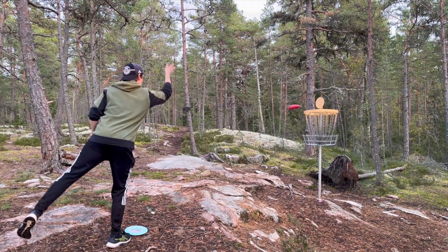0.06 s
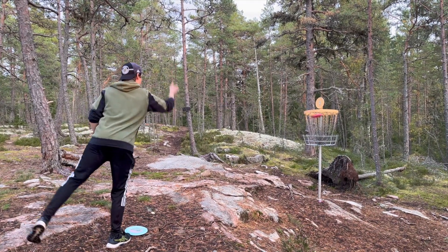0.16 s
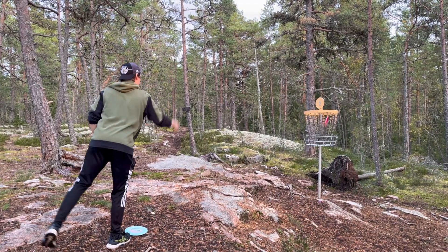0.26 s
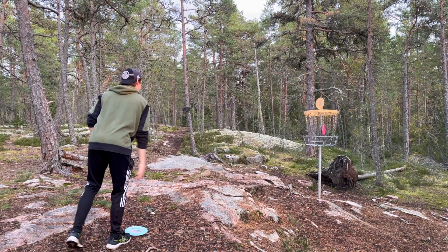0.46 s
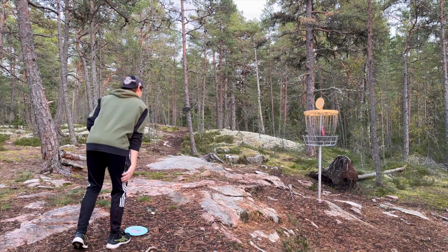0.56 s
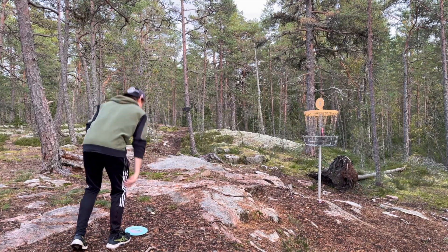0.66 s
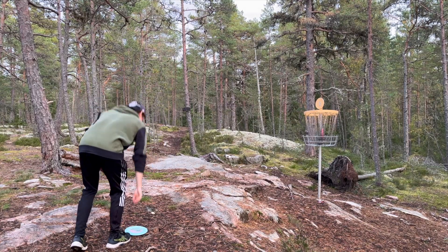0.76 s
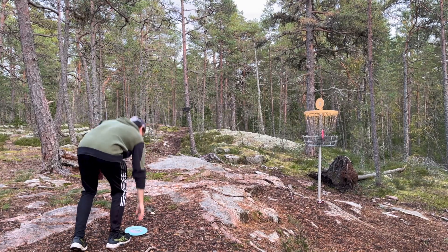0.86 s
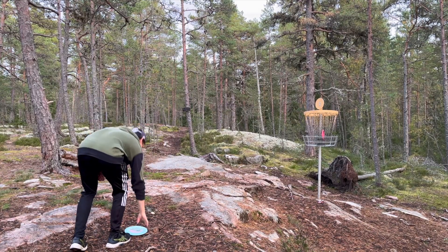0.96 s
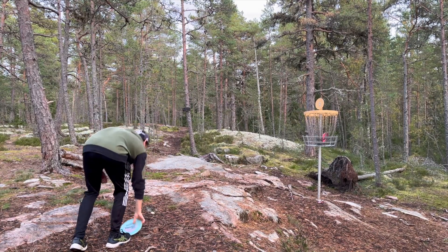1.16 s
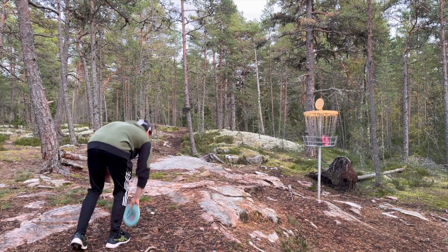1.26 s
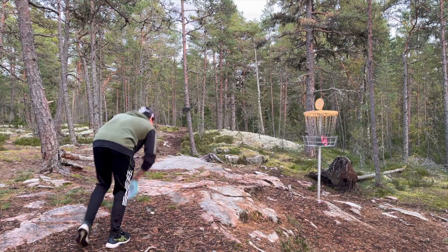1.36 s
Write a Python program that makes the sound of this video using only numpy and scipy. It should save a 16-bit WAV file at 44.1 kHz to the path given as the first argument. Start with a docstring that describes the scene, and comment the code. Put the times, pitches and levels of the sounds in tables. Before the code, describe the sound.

In a quiet forest, chains jangle brightly as a thrown disc strikes a basket a few metres off, slightly to the right. The rattle settles, the disc drops into the tray with hollow knocks, and the metal rings on faintly.

```python
"""A disc golf basket in a quiet forest

A plastic disc flies into the basket's steel chains a few metres away. The chains jangle in surges
as they swing, steel clangs on steel, and at last the disc drops into the wire tray.
The basket's frame rings on, and tree trunks scatter a thin echo over a low hush of air."""
import sys
import numpy as np
from scipy import signal
from scipy.fft import rfft, irfft, next_fast_len
from scipy.io import wavfile
from scipy.ndimage import map_coordinates

SR = 44100
rng = np.random.default_rng(int(sys.argv[2]) if len(sys.argv) > 2 else 0)


def generate_wav(signal):
    """Clip the signal to [-1, 1] and save it as 16-bit WAV at the path in sys.argv[1]."""
    frames = np.transpose(np.atleast_2d(signal))
    scaled = np.clip(frames, -1, 1) * 32767
    pcm = np.round(scaled).astype(np.int16)
    wavfile.write(sys.argv[1], SR, pcm)


N = 61739
LOWEST_HZ, TREBLE_HZ, TOP_HZ = 447.6, 7030, 15850  # edges of the chains' lower and upper ranges


def amp(db):
    """Turn decibels into a number to multiply by."""
    return 10 ** (np.asarray(db) / 20)


def unit(x):
    """Scale a signal to an average power of 1."""
    return x / np.sqrt(np.mean(x ** 2) + 1e-20)


def along(points, hz):
    """Read a curve drawn through (Hz, value) points, with octaves evenly spaced."""
    point_hz, values = np.transpose(points)
    return np.interp(np.log(hz + 1), np.log(point_hz + 1), values)


def filtered(x, response):
    """Multiply each frequency in x by response(hz)."""
    size = next_fast_len(N + SR // 2)
    return irfft(rfft(x, size) * response(np.fft.rfftfreq(size, 1 / SR)), size)[..., :N]


def coloured(x, colour):
    """Turn frequencies up or down along a curve of (Hz, dB) points."""
    return filtered(x, lambda hz: amp(along(colour, hz)))


def noise(colour):
    """Noise of the given colour, with a power of 1."""
    return unit(coloured(rng.standard_normal(N), colour))


def fade(t, ring_s):
    """Start at t = 0 and die away; the ring time is how long a fall of 60 dB takes."""
    return (t >= 0) * np.exp(-np.log(1000) * np.maximum(t, 0) / ring_s)


def since(start):
    """Seconds since the start, at every sample."""
    return np.arange(N) / SR - start


def wobble(per_s):
    """A smooth curve through per_s random values a second."""
    return map_coordinates(rng.standard_normal(512), [np.arange(N) * per_s / SR], mode='wrap')


def ring(tones, start, high_db=0, high_hz=TREBLE_HZ, scatter_db=1, sustain=1, beat_hz=0):
    """A struck object rings in wavering tones; beat_hz gives each low one a twin, so it pulses."""
    t, out = since(start), np.zeros(N)
    for hz, db, ring_s in tones:
        wavering_hz = hz + 9.1 * wobble(per_s=60)
        phase = 2 * np.pi * np.cumsum((t >= 0) * wavering_hz) / SR
        twin = amp(-1.5) * (beat_hz > 0 and hz < high_hz) * np.sin(phase + 2 * np.pi * beat_hz * t)
        gain = amp(db + scatter_db * rng.standard_normal() + high_db * (hz > high_hz))
        out += gain * fade(t, ring_s * sustain) * (np.sin(phase) + twin)
    return out


def air():
    """The air makes a low, wavering hush, nearly the same in both ears."""
    # The colour of the hush. Each row: frequency in Hz, level in dB.
    colour = [(20, -21), (48, -2.5), (160, -2), (230, -6.5), (420, -11.5), (850, -14), (1200, -20),
              (2500, -45), (12000, -65.5)]
    level = amp(-52.5 + 1.5 * wobble(per_s=13.93))
    middle, side = noise(colour), amp(-14.5) * noise(colour)
    return level * (middle + np.array([side, -side]))


def links(motion, peak_hits_per_s, low_hz, high_hz, count=20, tones=5):
    """Links collide at random, less often and more softly as they settle; each ticks and rings."""
    out, t = np.zeros(N), np.arange(SR // 3) / SR
    chance = peak_hits_per_s / count / SR * (motion / motion.max() + 1e-9) ** .45
    band = signal.butter(3, [low_hz, high_hz], 'band', fs=SR, output='sos')
    for link in range(count):
        slots = np.arange(tones) + (link + rng.random(tones)) / count  # each link has its own pitches
        hz = low_hz + (high_hz - low_hz) * slots / tones
        waves = np.sin(2 * np.pi * (hz[:, None] * t + rng.random((tones, 1))))
        ringing = waves.sum(0) * fade(t, ring_s=.13)
        tick = signal.sosfilt(band, rng.standard_normal(len(t)) * fade(t, ring_s=.0047))
        voice = unit(ringing) + amp(-4) * unit(tick)
        force = unit(amp(5.5 * np.clip(rng.standard_normal(N), -2, 2)))
        hits = (rng.random(N) < chance) * force / np.sqrt(chance)
        out += signal.fftconvolve(hits * motion, voice / np.linalg.norm(voice))[:N]
    return out / np.sqrt(count)


def chains():
    """The swinging chains jangle in surges that rise fast and die away."""
    # The surges. Each row: start in seconds, level in dB, rise time in seconds,
    # seconds to fade by 60 dB, extra treble in dB.
    surges = [(0.212, -30, 0.002, 0.51, 0), (0.221, -30, 0.0066, 0.11, 8.5), (0.242, -29, 0.017, 0.36, 1),
              (0.331, -31.5, 0.0025, 0.36, -2), (0.334, -28, 0.0024, 0.041, 7),
              (0.391, -41, 0.015, 0.46, 7.5), (.465, -28.5, 0.0014, 0.04, 5), (0.47, -39, 0.016, 0.62, 2),
              (0.603, -39.5, 0.0059, 0.51, 3), (.707, -42, 0.0043, 0.22, 4.5),
              (.724, -39.5, 0.0055, 0.28, 3), (.81, -50, 0.017, 0.52, 1.5),
              (0.922, -46.5, 0.00504, 0.18, -0.5), (.96, -50.5, 0.015, 0.53, -1.5),
              (1.033, -52, 0.01, 0.43, 1), (1.128, -31, 0.00056, 0.0385, 0),
              (1.135, -39.5, 0.0033, 0.23, -3), (1.195, -52, 0.0055, 0.5, -6.5),
              (1.322, -43, 0.0087, 0.17, 0.5)]
    # The colour of the jangle. Each row: frequency in Hz, boost or cut in dB.
    colour = [(200, -66), (550, -12.5), (850, -20), (1100, -12.5), (1500, 0), (1900, -11), (2400, -2.5),
              (3000, 4.5), (3400, 5), (3600, -1), (3900, 8), (4400, -2.5), (5600, -1.5), (8000, -1),
              (9800, 2.5), (13000, 5.5), (14600, 6), (15700, -34)]
    body_energy, treble_energy = np.zeros(N), np.zeros(N)
    for start, db, rise_s, fade_s, treble_db in surges:
        t = since(start)
        surge = amp(db) * np.clip(t / rise_s, 0, 1) * fade(np.maximum(t - rise_s, 0), fade_s)
        body_energy += surge ** 2
        treble_energy += (surge * amp(treble_db)) ** 2
    body = links(np.sqrt(body_energy), 1600, LOWEST_HZ, TREBLE_HZ)
    light_touches = links(np.sqrt(treble_energy), 4500, TREBLE_HZ, TOP_HZ)
    jangle = body + light_touches
    top = filtered(jangle, lambda hz: 1 / (1 + (11300 / (hz + 1)) ** 20))
    top_kept = (treble_energy / treble_energy.max()) ** .2  # gentler hits lose their highest treble
    return coloured(jangle + top * (top_kept - 1), colour)


def clangs():
    """Steel strikes steel, and tones close in pitch shimmer against each other."""
    # The hard blows. Each row: start in seconds, level in dB, extra treble in dB,
    # how many times longer the steel rings, pulsing rate in Hz.
    blows = [(0.213, -40, 3, 0.51, 107), (.333, -22, 4.5, 0.59, 43), (.358, -25, 3, 1.57, 32.6),
             (.375, -21.5, -6, 0.2, 20), (.58, -45.5, -11, 1.9, 32.6), (1.131, -35, -1.5, 1.18, 8.3)]
    # The tones of the basket's steel. Each row: pitch in Hz, level in dB, ring time in seconds.
    steel_tones = [(2813, -28, .45), (3800, -1, .3), (3858, -14, .35), (3918, -15, .16), (4060, -8, .07),
                   (5683, -19, .2), (10441, -8, .25), (10715, -10, .22), (10910, -12, .15)]
    out = np.zeros(N)
    for start, db, high_db, sustain, beat_hz in blows:
        rise = np.clip(since(start) / .0015, 0, 1)
        out += amp(db) * rise * ring(steel_tones, start, high_db, sustain=sustain, beat_hz=beat_hz)
    return out


def disc():
    """Light plastic gives short, hollow knocks; a blow on the rim brings out the higher tones."""
    # The disc's knocks. Each row: start in seconds, level in dB, boost of the higher tones in dB.
    knocks = [(0.2137, -28, 11), (.228, -29, -22), (0.262, -28.5, 1), (.271, -31.5, -6), (.304, -36, -2),
              (0.378, -43.5, 4), (1.13, -41, 5), (1.3087, -31.5, -8), (1.329, -32.5, -6), (1.344, -33, -1),
              (1.35, -39.5, -10)]
    # The tones of the plastic. Each row: pitch in Hz, level in dB, ring time in seconds.
    plastic_tones = [(556.7, -16.5, 0.11), (704, -17, 0.04), (805, -16, 0.055), (930, -7.5, 0.039),
                     (1302, -6, 0.045), (1610, -12, 0.035), (2094, -8, 0.023), (2490, -5, 0.01)]
    # The colour of the crack that opens each knock. Each row: frequency in Hz, level in dB.
    crack_colour = [(300, -12), (900, 2), (2600, 3), (5000, -20)]
    out = np.zeros(N)
    for start, db, rim_db in knocks:
        ringing = ring(plastic_tones, start, rim_db, high_hz=1800, scatter_db=5.5)
        crack = amp(-9) * fade(since(start), ring_s=.025) * noise(crack_colour)
        out += amp(db) * (ringing + crack)
    bass_cut = signal.butter(2, LOWEST_HZ, 'high', fs=SR, output='sos')
    return signal.sosfilt(bass_cut, out)


def clinks(ring_s=.2):
    """Now and then a single link rings out with one clear tone."""
    # The single links. Each row: start in seconds, pitch in Hz, level in dB.
    single_links = [(0.306, 3045, -39), (0.612, 3200, -42), (0.732, 2853, -38.5), (.752, 3878, -37.5),
                    (0.967, 4080, -47), (1.05, 3165, -49)]
    return sum(ring([(hz, db, ring_s)], start) for start, hz, db in single_links)


def tray():
    """The disc lands in the wire tray, which rings lower than the clanging steel."""
    # The disc's landings. Each row: start in seconds, level in dB.
    landings = [(1.326, -49), (1.345, -42)]
    # The tones of the tray. Each row: pitch in Hz, level in dB, ring time in seconds.
    wire_tones = [(535, -7, .4), (1241, 0, .45), (1610, -10, .3), (2800, -11, .25)]
    return sum(amp(db) * ring(wire_tones, start) for start, db in landings)


def echo_and_frame(sound):
    """A thin forest echo, with the basket's frame ringing on at a middle pitch."""
    # How long the echo and the frame ring. Each row: frequency in Hz, seconds to fade by 60 dB.
    fade_times = [(200, 0.45), (1400, 4.06), (3500, 1.63), (8000, 0.61), (15000, 0.55)]
    # Their colour. Each row: frequency in Hz, level in dB.
    colour = [(200, 4), (1400, -6), (3500, -8.5), (8000, -18.5), (15000, -9.5)]
    hz, t, bands = signal.stft(rng.standard_normal((2, SR)), SR, nperseg=256)
    bands = bands * fade(t, along(fade_times, hz)[:, None])
    bands /= np.sqrt(np.mean(abs(bands) ** 2, axis=-1, keepdims=True))  # same energy in every band
    tail = signal.istft(bands, SR, nperseg=256)[1]
    middle, side = signal.fftconvolve(sound[None], tail / np.linalg.norm(tail[0]), axes=1)[:, :N]
    return coloured(middle + amp(-12) * np.array([side, -side]), colour)


def place_right(pair):
    """The basket stands to the right, so level and timing differ between the ears."""
    # The balance between the ears. Each row: frequency in Hz, left level minus right level in dB.
    balance = [(300, 1), (850, -4), (1500, -3.5), (2100, 0), (3900, -.5), (4700, 3), (5700, 8), (6600, 6),
               (7600, 0)]
    # The timing between the ears. Each row: frequency in Hz, how far the left wave leads in radians.
    lead = [(250, 0), (550, -.5), (1550, -1.3), (1900, -.25), (3300, 0), (4050, -.5), (4700, 0), (5900, -1),
            (7500, -3), (8800, -3.2), (11400, -6.2), (12600, -6.3), (15000, -9.3)]
    sides = np.array([[1], [-1]])

    def response(hz):
        return amp(sides * along(balance, hz) / 2) * np.exp(.5j * sides * along(lead, hz))
    return filtered(pair, response)


def scene():
    """The chains hang all round the pole, so part of their jangle is different in each ear."""
    # The jangle that spreads to the sides. Each row: frequency in Hz, level in dB.
    spread_colour = [(300, -16), (1400, -12), (3000, -18), (4000, -12), (5200, -5), (6500, -3), (7800, -18),
                     (10000, -11), (12000, -18), (14000, -11)]
    hit = chains() + clangs() + disc() + clinks() + tray()
    spread = coloured(chains(), spread_colour)
    return air() + place_right(hit + np.array([spread, -spread]) + echo_and_frame(hit))


def record(dry):
    """Cut away everything above TOP_HZ."""
    return filtered(dry, lambda hz: hz < TOP_HZ)


dry = scene()
out = record(dry)
generate_wav(out)
```